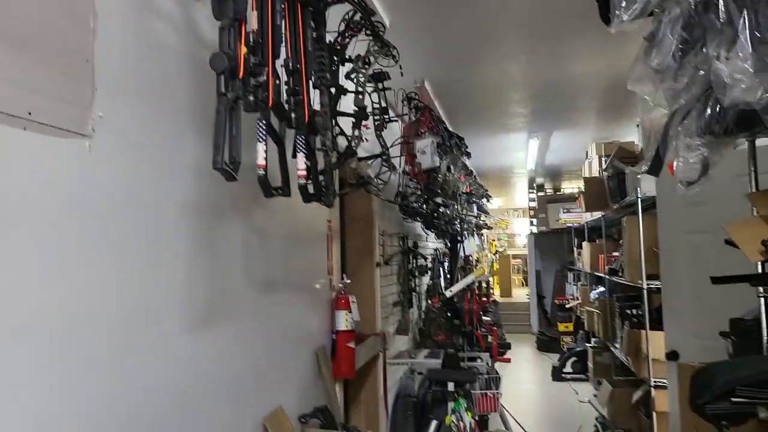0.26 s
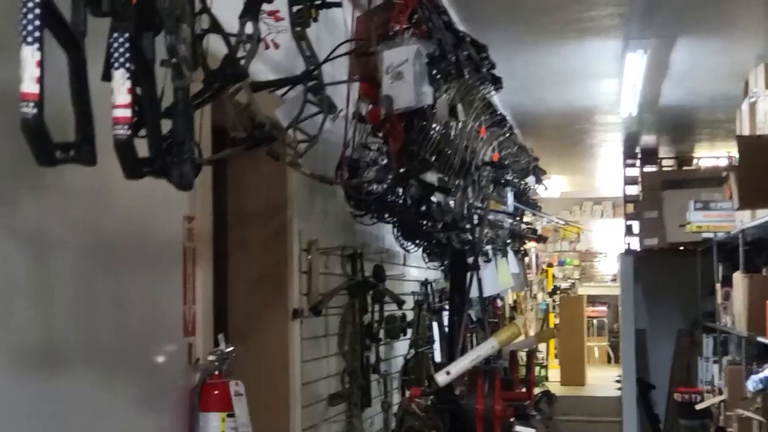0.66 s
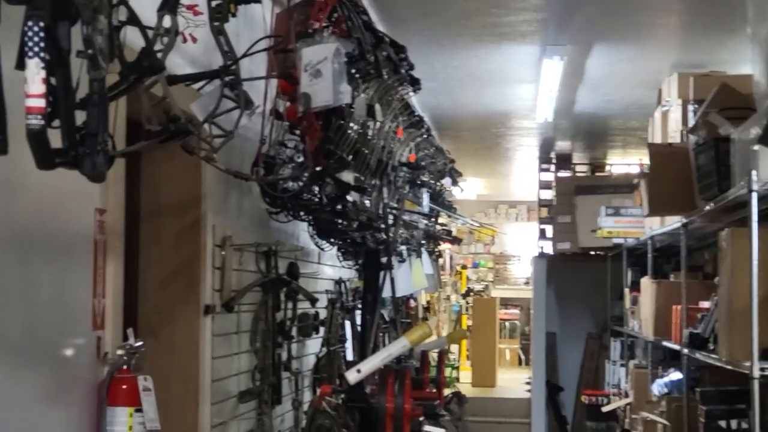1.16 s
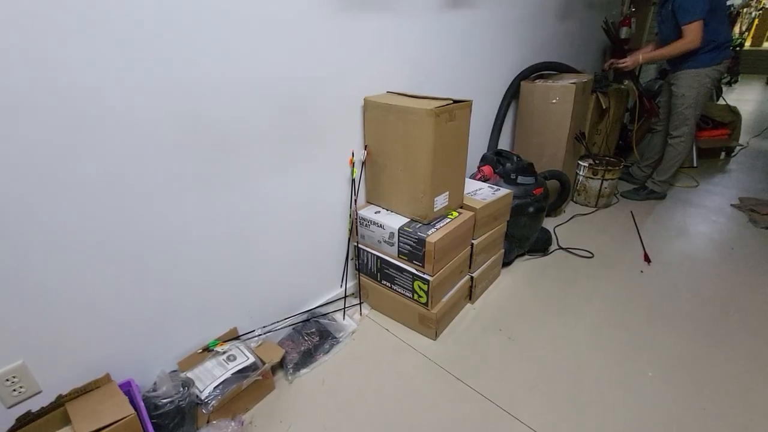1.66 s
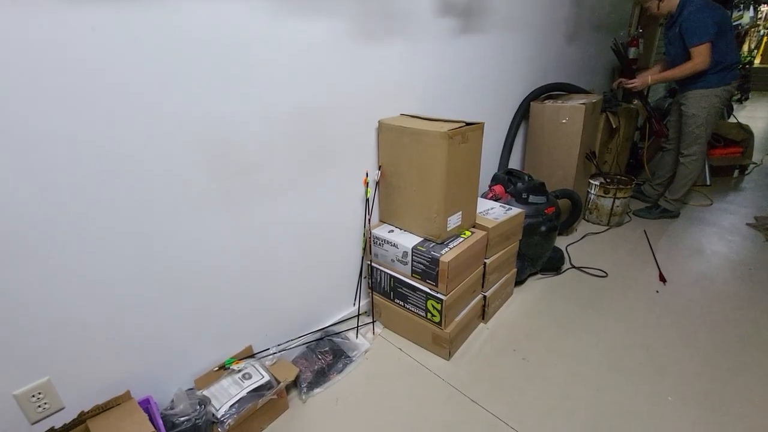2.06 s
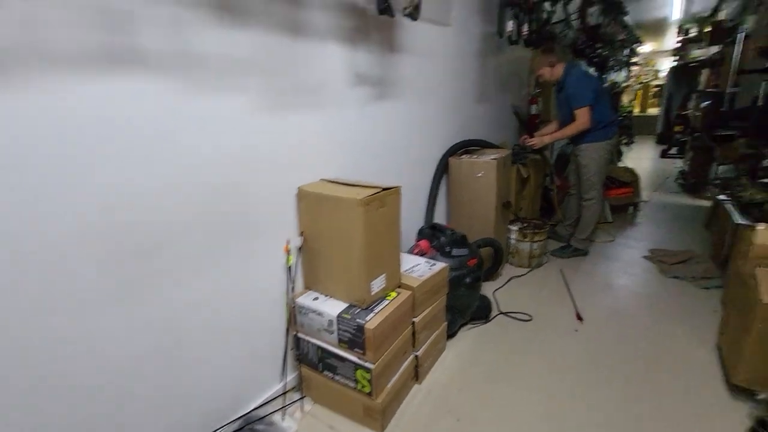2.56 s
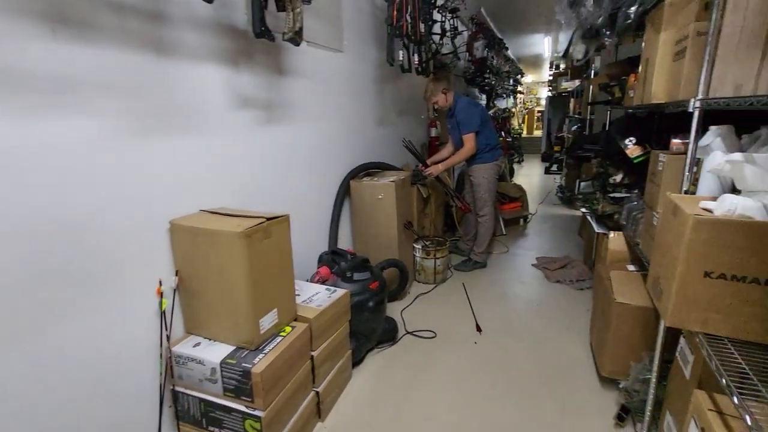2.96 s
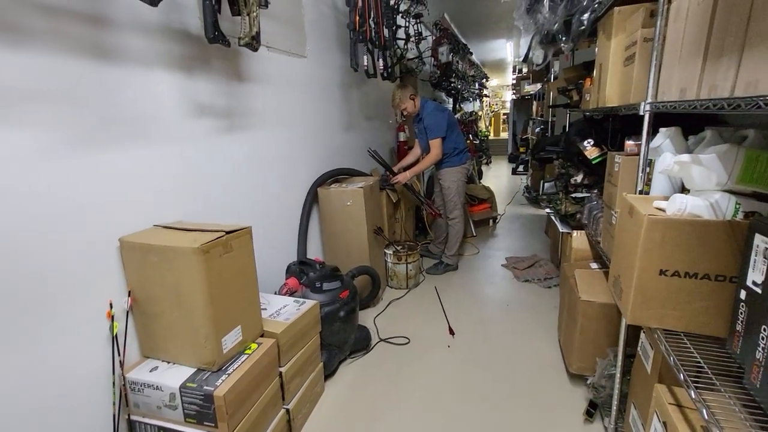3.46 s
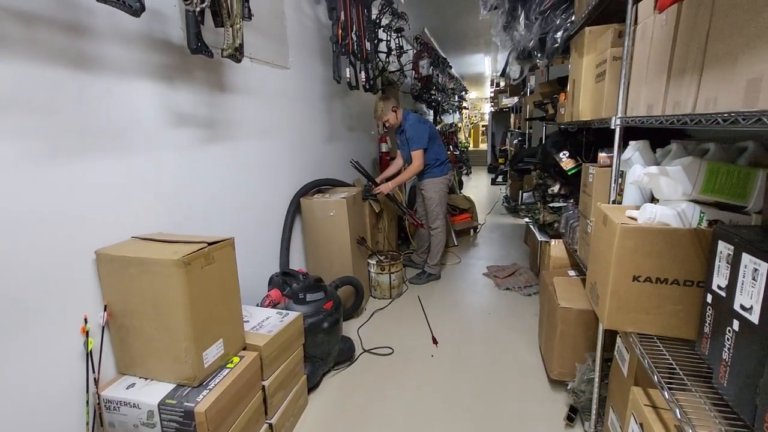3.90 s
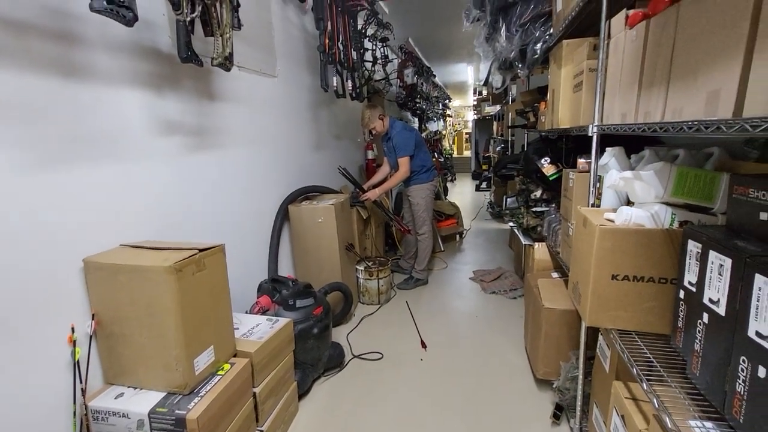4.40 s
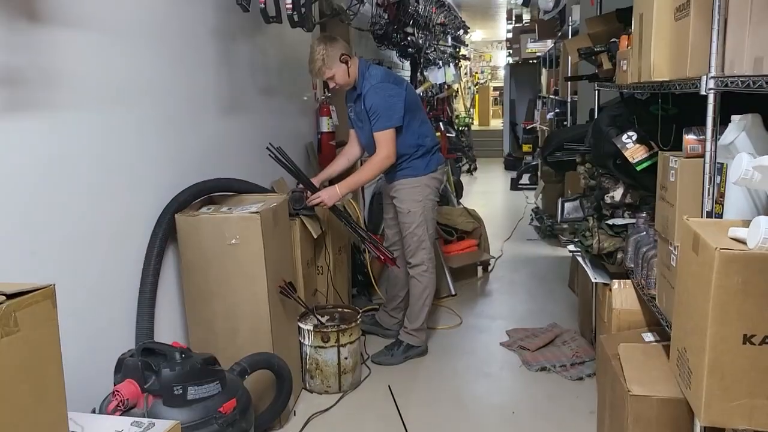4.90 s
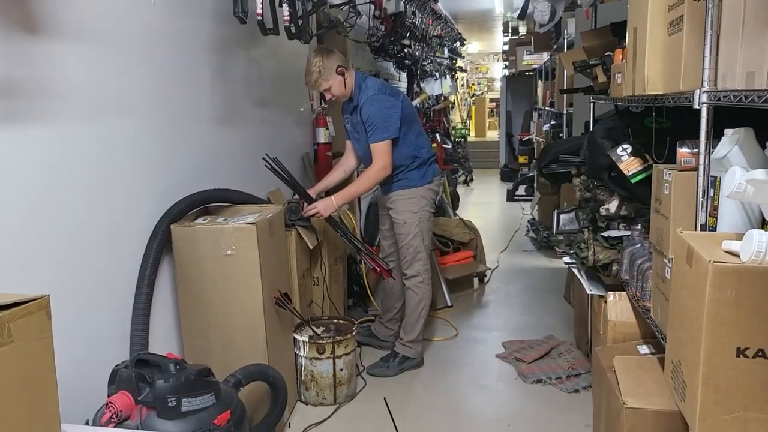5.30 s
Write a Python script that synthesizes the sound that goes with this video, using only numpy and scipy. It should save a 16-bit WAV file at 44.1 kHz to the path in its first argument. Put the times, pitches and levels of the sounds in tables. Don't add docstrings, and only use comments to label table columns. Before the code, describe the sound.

For the first 1.6 seconds a storeroom is very quiet: soft, uneven low rumble, faint airy hiss and a barely present, very high lamp whine, with the air rising slightly at about 0.3 seconds. A tiny gap marks a hard cut, and at 1.6 seconds a shop vacuum is instantly there at full speed, far louder. Its broad, hollow rush of air is steady, with a constant mid-pitched motor hum and a wavering high fan whine. A lower saw hum beside it rises slightly in pitch. Around 2.4 seconds the stereo image shifts as the camera swings, and the hiss gradually brightens on approach. From about 4.2 seconds the saw touches a thin tube and its pitch sags; bright, buzzing, ringing bites come near 4.2, 4.7 and 5.0, then the hardest at 5.3, continuing almost to the end at about 5.6.

```python
import sys
import numpy as np
from scipy import signal
from scipy.io import wavfile
from scipy.ndimage import uniform_filter1d

SR = 44100
rng = np.random.default_rng(int(sys.argv[2]) if len(sys.argv) > 2 else 0)


def wrap_up_sound(samples):
    columns = np.atleast_2d(samples).T
    tamed = np.clip(columns, -1, 1)
    steps = np.round(tamed * 32767).astype(np.int16)
    wavfile.write(sys.argv[1], SR, steps)


def amplitude_ratio(level_db):
    exponent = np.asarray(level_db, float) / 20
    return 10 ** exponent


N = 244402
T = np.arange(N) / SR
HOP, WINDOW = 512, 2048
FRAMES = N // HOP + 6
FRAME_S = np.arange(FRAMES) * HOP / SR
HZ = np.fft.rfftfreq(WINDOW, 1 / SR)

ROOM_ENDS_S, VACUUM_STARTS_S = 1.5782, 1.5982
SWING_S, SWING_LENGTH_S = 2.4, .2
TOUCH_S = 4.16

# frequency in Hz, lead in rad.
LEAD_NEAR_RAD = [(0, 0), (860, 2.9), (1720, 2.6), (2330, 7.6), (3100, 10.4), (4310, 19.5), (6030, 26.6),
                 (7410, 24.5), (8530, 28.7), (9560, 23.3), (11900, 28.6), (13400, 38.8), (14800, 43.8),
                 (16500, 47.8)]


def read(points, hz):
    f, value = np.transpose(points)
    return np.interp(np.log(hz + 1), np.log(f + 1), value)


def curve(rows, x, column=1):
    rows = np.array(rows)
    return np.interp(x, rows[:, 0], rows[:, column])


def evened(x):
    return x / np.sqrt(np.mean(abs(x) ** 2) + 1e-20)


def drift(shape, size):
    field = rng.standard_normal(shape)
    for axis, span in enumerate(size):
        field = uniform_filter1d(field, span, axis)
        field = uniform_filter1d(field, span, axis)
    return evened(field)


def humps(modes, hz):
    return sum(amplitude_ratio(db) ** 2 / (1 + (2 * (hz - f) / width) ** 2) for f, width, db in modes)


def ramp(t, start, length):
    return np.clip((t - start) / length, 0, 1)


def walked(t):
    return ramp(t, VACUUM_STARTS_S, N / SR - VACUUM_STARTS_S)


def lag(lead_rad):
    return np.exp(-1j * curve(lead_rad, HZ) * np.clip(HZ / 500, 0, 1))[:, None]


def air(field_db, likeness, lead, lean_db, patchy_db):
    a, b, c, d = rng.standard_normal((FRAMES, len(HZ), 4)).T
    shared = np.clip(read(likeness, HZ), 0, 1)[:, None] * lead
    left = a + 1j * b
    right = shared * left + np.sqrt(1 - abs(shared) ** 2) * (c + 1j * d)
    ripples = np.array([drift((FRAMES, len(HZ)), size=(130, 2)).T for _ in range(2)])
    ripples *= (1 / (1 + (HZ / 5000) ** 2) * HZ / (HZ + 300))[:, None]
    sides_db = np.multiply.outer([.5, -.5], lean_db)[:, :, None]
    spectra = np.array([left, right]) * amplitude_ratio(field_db + sides_db + patchy_db * ripples)
    return signal.istft(spectra, nperseg=WINDOW, noverlap=WINDOW - HOP)[1][:, :N]


def tone(turns, scatter, size):
    wander = [drift((FRAMES,), size=(size,)) + 1j * drift((FRAMES,), size=(size,)) for _ in range(2)]
    share = np.clip(scatter, 0, 1)
    paths = np.sqrt(1 - share) + np.sqrt(share / 2) * np.array(wander)
    at = np.arange(turns.shape[-1]) / HOP
    paths = np.array([np.interp(at, np.arange(FRAMES), path) for path in paths])
    return np.sqrt(2) * (paths * np.exp(2j * np.pi * turns))


def storeroom():
    # frequency in Hz, density in dB per Hz.
    room_tone_db = [(20, -15), (80, 5), (110, -15), (180, -14), (470, -26), (1000, -29.5), (2600, -31),
                    (3000, -40), (3700, -37.5), (5200, -41.5), (7000, -45), (8000, -70), (9800, -64),
                    (16000, -60)]
    # frequency in Hz, left-right likeness 0-1.
    room_likeness = [(60, 0.93), (300, 0.96), (600, 0.69), (1000, 0.1), (3000, 0.1), (7000, .1), (8200, .7),
                     (9500, .15)]
    # frequency in Hz, left lead in rad.
    room_lead_rad = [(0, 0), (500, -.2), (780, .2), (1460, 3.2), (1980, 3.6), (3100, 9.2), (3700, 9.5),
                     (5600, 15.5), (7400, 19), (9000, 18.9)]
    step_s, step_db, lumps_db = .32, 3.0, 2.5
    lamp = [(15000, 100, 9)]  # Hz, width Hz, dB

    colour_db = read(room_tone_db, HZ) + 10 * np.log10(1 + humps(lamp, HZ))
    air_db = step_db * ramp(FRAME_S, step_s, .08)
    low = np.clip((350 - HZ) / 150, 0, 1)[:, None]
    rumble_db = 0.5 * air_db - 6.0 + lumps_db * drift((FRAMES,), size=(5,))
    field_db = colour_db[:, None] + air_db + low * rumble_db
    lean_db = 1.2 - 3.2 * np.log10(1 + HZ / 500)
    both = air(field_db, room_likeness, lag(room_lead_rad), lean_db, patchy_db=4.5)
    level = amplitude_ratio(-48.0) / np.sqrt(np.mean(both[:, T < ROOM_ENDS_S] ** 2))
    return level * both * np.clip((ROOM_ENDS_S - T) / .001, 0, 1)


def rush():
    # frequency in Hz, density in dB per Hz.
    drum_db = [(12, -70), (20, -5), (204, -10), (253, -22), (279, -5.5), (308, -8.5), (381, -11),
               (413, -7.5), (441, -11), (471, -3), (503, -13.5), (686, -6), (1000, -11), (1300, -56),
               (2200, -120)]
    hiss_db = [(1000, -4.5), (1250, -3), (1480, -7.5), (1850, -6), (2840, -9.5), (3800, -5.5), (4500, -4.5),
               (5210, -8), (6340, -6.5), (7400, -16.5), (8400, -20), (9500, -20.5), (12900, -11.5),
               (15500, -9)]
    rumble_density_db = [(12, -61), (20, -16.5), (92, -10.5), (118, -3), (146, -7), (183, 0), (216, 5),
                         (235, -1), (310, -31), (520, -120)]
    # frequency in Hz, width in Hz, level in dB.
    hose_modes = [(620, 40, 4), (690, 50, 4), (870, 50, 0), (1630, 40, 3), (1735, 60, 4), (1850, 80, 7),
                  (1980, 35, -1), (2115, 30, -2), (2300, 60, 0), (3110, 90, 2), (3515, 80, 0),
                  (4350, 120, -1), (6200, 250, -3)]
    # frequency in Hz, left-right likeness 0-1.
    rush_likeness = [(60, 1), (300, 0.97), (520, 1), (700, 0.25), (1000, 0.79), (1300, 0.31), (1800, 0.99),
                     (2500, 0.2), (4000, 0.33), (8000, 0.048), (15000, 0.13)]
    # frequency in Hz, left lead in rad.
    lead_far_rad = [(0, 0), (520, .2), (860, 3.0), (1250, 4.4), (1550, 3.2), (1780, 6.3), (2150, 7.9),
                    (2600, 6.5), (3000, 9.0), (3350, 7.9), (3900, 9.4), (4500, 12.6), (5250, 15.7),
                    (6400, 18.8), (16000, 40)]
    # frequency in Hz, left minus right in dB.
    rush_lean_db = [(60, 4.5), (110, 1.5), (200, 0), (380, -3), (700, 1), (1290, 3.5), (2380, -4.5),
                    (4400, 0), (8120, -2), (15000, 0)]
    # frequency in Hz, width in Hz, level before the swing in dB, level at the end in dB.
    facing_bands = [(710, 89, 0, 1.5), (1740, 110, 2, -1.5), (2070, 220, -5, 1), (2880, 95, -2.5, -2.5),
                    (4340, 200, -3, 1)]
    brighten_db, brighten_db_per_s = -3.5, 0.96
    rumble_db_per_s, rumble_lumps_db = -0.2, 2.5
    level_db, swell_db = -14.5, 1.27

    low_db = read(drum_db, HZ) + 1.0
    high_db = read(hiss_db, np.minimum(HZ, 15500)) - 1.5
    colour_db = np.where(HZ < 1000, low_db, high_db)
    colour_db = np.where(HZ < 200, read(rumble_density_db, HZ) - 9.0, colour_db)
    colour_db = colour_db + 10 * np.log10(1 + humps(hose_modes, HZ))

    top = np.clip(np.log(HZ / 6500 + 1e-9) / np.log(1.7), 0, 1.3)[:, None]
    bottom = np.clip((200 - HZ) / 80, 0, 1)[:, None]
    since_s = FRAME_S - VACUUM_STARTS_S
    top_db = brighten_db + brighten_db_per_s * since_s
    bottom_db = 1.0 + rumble_db_per_s * since_s + rumble_lumps_db * drift((FRAMES,), size=(8,))

    near = ramp(FRAME_S, SWING_S, SWING_LENGTH_S)
    turned = .5 * near + .5 * walked(FRAME_S) ** 2
    facing_db = sum(np.exp(-((HZ - hz) / width) ** 2)[:, None] * (first_db + (last_db - first_db) * turned)
                    for hz, width, first_db, last_db in facing_bands)
    gusts_db = .5 * drift((FRAMES,), size=(5,))
    field_db = colour_db[:, None] + top * top_db + bottom * bottom_db + facing_db + gusts_db
    lead = (1 - near) * lag(lead_far_rad) + near * lag(LEAD_NEAR_RAD)
    noise = air(field_db, rush_likeness, lead, read(rush_lean_db, HZ), patchy_db=5.5)
    return evened(noise) * amplitude_ratio(level_db + swell_db * np.sin(np.pi * walked(T)))


def along(rule):
    start, step, rate = np.array(rule)[:, :, None]
    return start + step * ramp(T, SWING_S, 2 * SWING_LENGTH_S) + rate * (T - VACUUM_STARTS_S)


def heard(place, turns, scatter):
    lead = np.exp(-1j * np.array([[0], [1]]) * place[2])
    return tone(turns, scatter, size=5) * lead * amplitude_ratio(place[:2])


def motor():
    # left in dB, right in dB, left lead in rad.
    hum_rule = [
        (-21.5, -23.5, .27),
        (0, -2, .3),
        (-.45, -.45, .09),
    ]
    third_rule = [
        (-36, -34.5, -2.6),
        (0, 0, 1),
        (.5, -.45, 1.15),
    ]
    # time in seconds, left in dB, right in dB, left lead in rad.
    whine_walk = [(1.7, -25, -27, -3), (2.15, -27, -33, -4.6), (2.5, -32.5, -31.5, -1.2),
                  (2.78, -31, -29, -3.6), (3.0, -32.5, -25.5, -6.4), (3.2, -31, -31, -9.5),
                  (3.55, -29.5, -29, -10.3), (4.1, -33.5, -31, -11), (5.0, -35.5, -30.5, -7.4)]
    # shaft order, left in dB, right in dB.
    weak_orders = [(2, -47.5, -44), (18, -50.5, -52)]
    shaft_hz, creep_hz, creep_from_s, creep_to_s = 441.2, .5, 3.2, 4.2
    blades = 9

    speed_hz = shaft_hz + creep_hz * ramp(T, creep_from_s, creep_to_s - creep_from_s)
    turns = np.cumsum(speed_hz) / SR
    whine = np.array([curve(whine_walk, T, column) for column in (1, 2, 3)])
    out = amplitude_ratio(3.5) * heard(along(hum_rule), turns, .004)
    out += amplitude_ratio(2.5) * heard(along(third_rule), 3 * turns, .15)
    out += amplitude_ratio(4.5) * heard(whine, blades * turns, .04)
    for order, left_db, right_db in weak_orders:
        out += tone(order * turns, .29, size=14) * amplitude_ratio([[left_db], [right_db]])
    return out.real


def saw_speed_hz():
    start_hz, free_hz, run_up_s = 251.6, 261.0, 1.02
    loaded_hz, sag_s = 249.5, .8
    running_s = np.minimum(T, TOUCH_S) - VACUUM_STARTS_S
    unloaded_hz = free_hz - (free_hz - start_hz) * np.exp(-running_s / run_up_s)
    return loaded_hz + (unloaded_hz - loaded_hz) * np.exp(-np.maximum(T - TOUCH_S, 0) / sag_s)


def pressure(t):
    # start in seconds, hold in seconds, pressure in dB.
    push_rows = [
        (4.23, .1, -2),
        (4.66, .1, -1.5),
        (4.99, .19, -1),
        (5.31, .22, 2.5),
    ]
    press_db_per_s, ease_db_per_s, touch_db = 110, 75, -11
    power = amplitude_ratio(touch_db) ** 2
    for start_s, hold_s, db in push_rows:
        rise_db = press_db_per_s * np.maximum(start_s - t, 0)
        ease_db = ease_db_per_s * np.maximum(t - start_s - hold_s, 0)
        power = power + amplitude_ratio(db - rise_db - ease_db) ** 2
    return np.sqrt(power) * ramp(t, TOUCH_S - .04, .06)


def saw():
    # frequency in Hz, level per order in dB.
    bite_colour_db = [(700, -40), (3000, -42), (6000, -41), (7000, -42), (8000, -49), (9500, -47),
                      (10500, -44), (12000, -43), (13500, -37), (14600, -33), (15700, -32)]
    # frequency in Hz, width in Hz, level in dB.
    tube_modes = [(2900, 300, 6), (4330, 150, 7), (4800, 90, 8), (5060, 70, 13), (6050, 80, 11),
                  (6560, 90, 11)]
    rim_db = {18: -9, 19: 3, 47: -4, 50: -4, 55: -2, 57: -5, 58: 1, 59: 6, 60: 2}
    hum_level_db, hum_arch_db = -27.5, 1

    speed_hz = saw_speed_hz()
    turns = np.cumsum(speed_hz) / SR
    hum = tone(turns, .0014, size=6)
    waver_db = 1.63 * np.interp(T, FRAME_S, drift((FRAMES,), size=(6,)))
    out = (hum * amplitude_ratio(hum_level_db + hum_arch_db * np.sin(np.pi * walked(T)) + waver_db)).real

    start = round((TOUCH_S - .05) * SR)
    slow = slice(start, N, HOP)
    push = pressure(T[slow])
    for order in range(3, 63):
        hz = order * speed_hz[slow]
        level_db = read(bite_colour_db, hz) + 10 * np.log10(1 + humps(tube_modes, hz))
        level = np.interp(T[start:], T[slow], amplitude_ratio(level_db) * push)
        sides = amplitude_ratio(np.array([[-2.5], [1.5]]) + rim_db.get(order, 0))
        behind = curve(LEAD_NEAR_RAD, hz.mean()) / (2 * np.pi) * np.array([[0], [1]])
        phase = order * turns[start:] + rng.random() - behind
        out[:, start:] += level * sides * tone(phase, .35, size=6).real
    return out


def scene():
    enters = np.clip((T - VACUUM_STARTS_S) / .0015, 0, 1)
    return storeroom() + enters * (rush() + motor() + saw())


def roll_off(x):
    return signal.sosfilt(signal.butter(12, 15735, fs=SR, output="sos"), x)


def record(dry):
    notch_hz, notch_width_hz, notch_db = 8430, 470, -6.5
    edge_hz = 15715
    notch = amplitude_ratio(notch_db * np.exp(-((HZ - notch_hz) / notch_width_hz) ** 2))
    port = signal.firwin2(511, HZ, np.append(notch[:-1], 1), fs=SR)
    edge = signal.firwin(2047, edge_hz, window=("kaiser", 10), fs=SR)
    clipped = np.clip(dry, -.92, .92)
    return roll_off(signal.oaconvolve(clipped, np.convolve(port, edge)[None], "same"))


dry = scene()
out = record(dry)
wrap_up_sound(out)
```